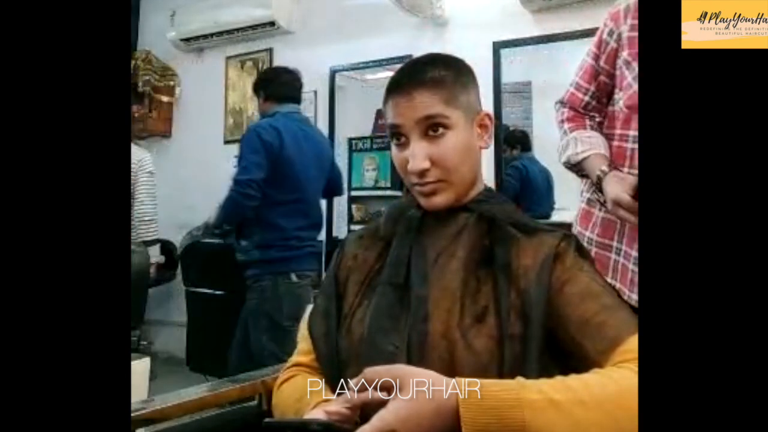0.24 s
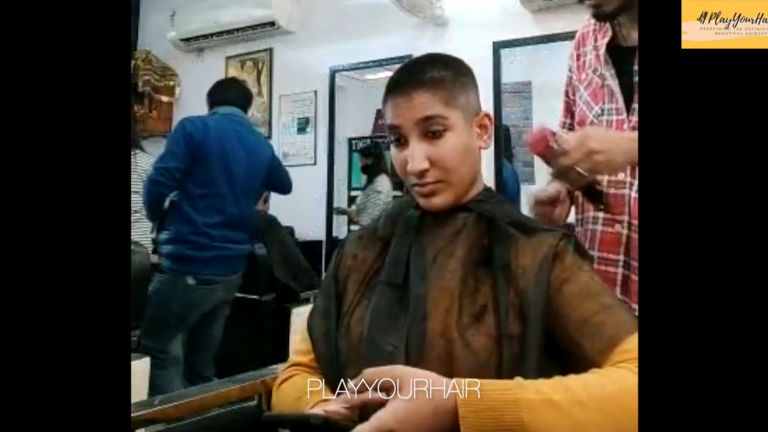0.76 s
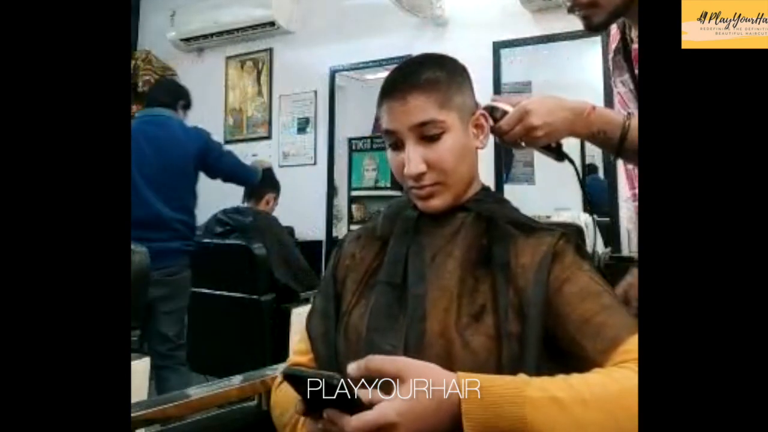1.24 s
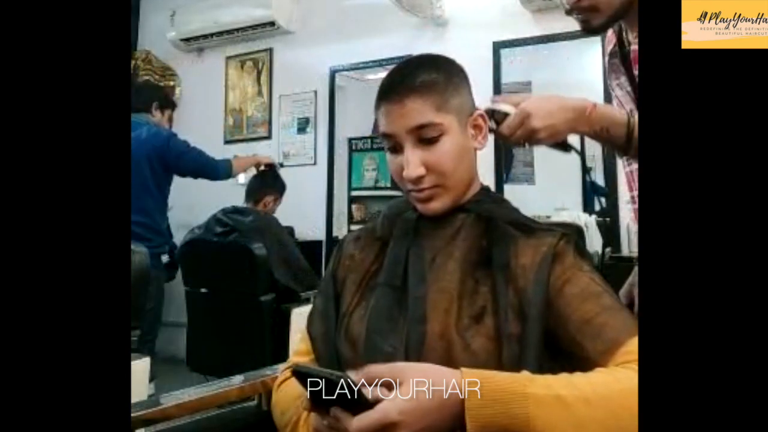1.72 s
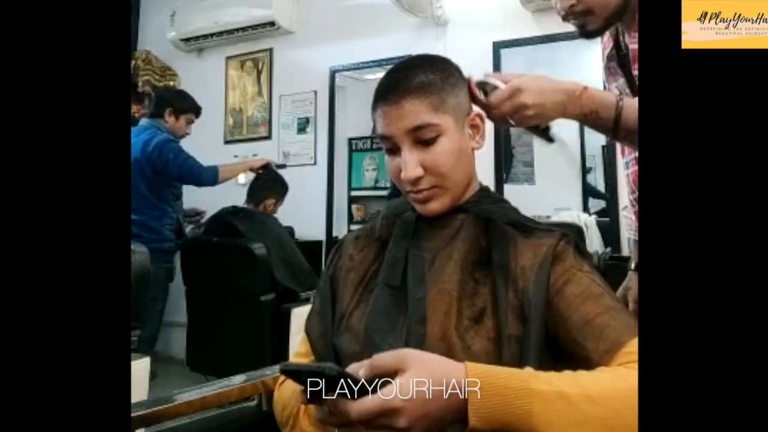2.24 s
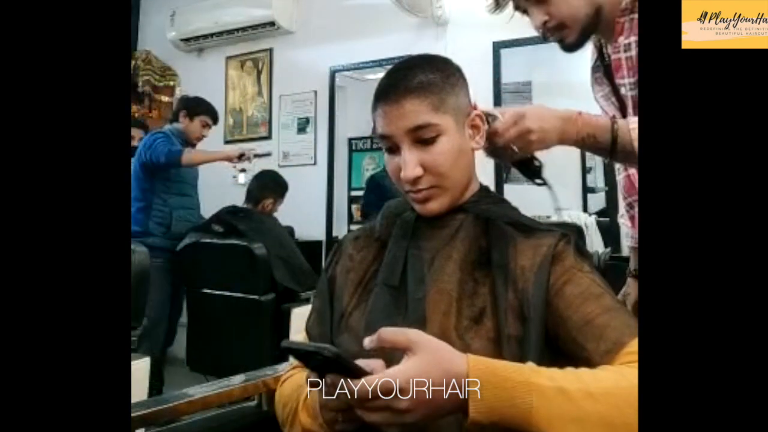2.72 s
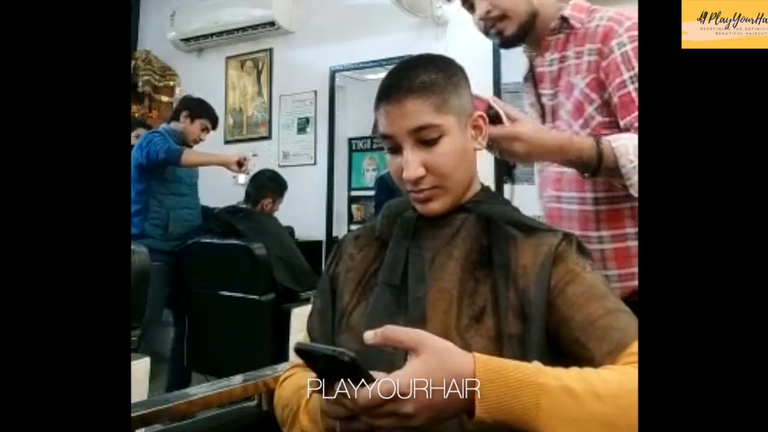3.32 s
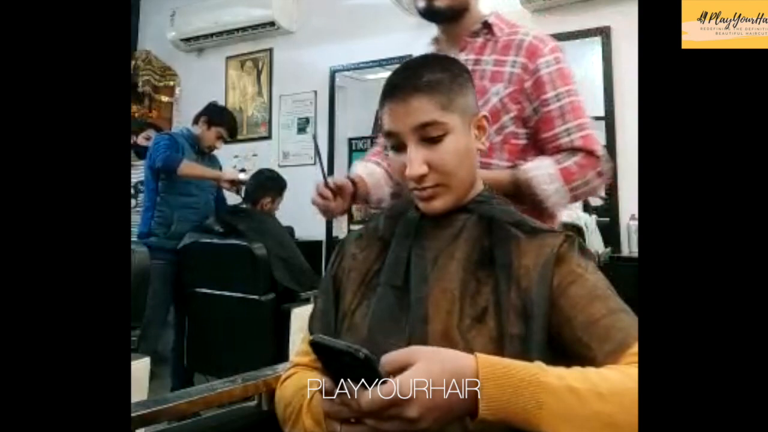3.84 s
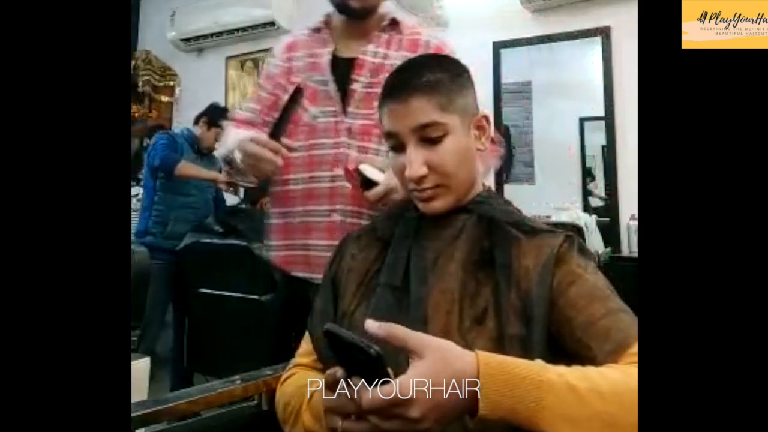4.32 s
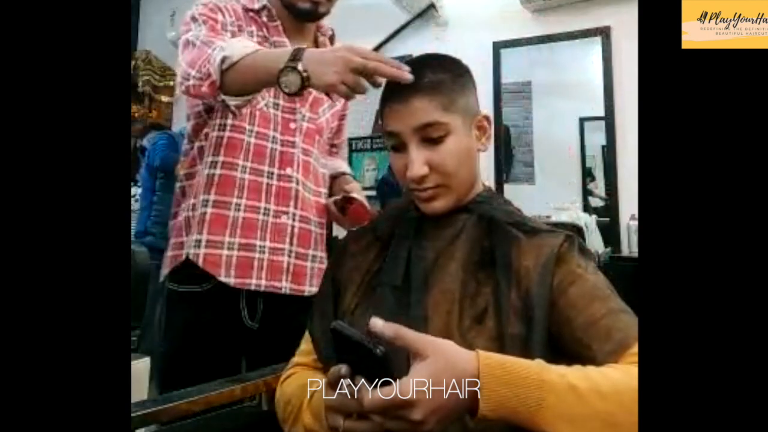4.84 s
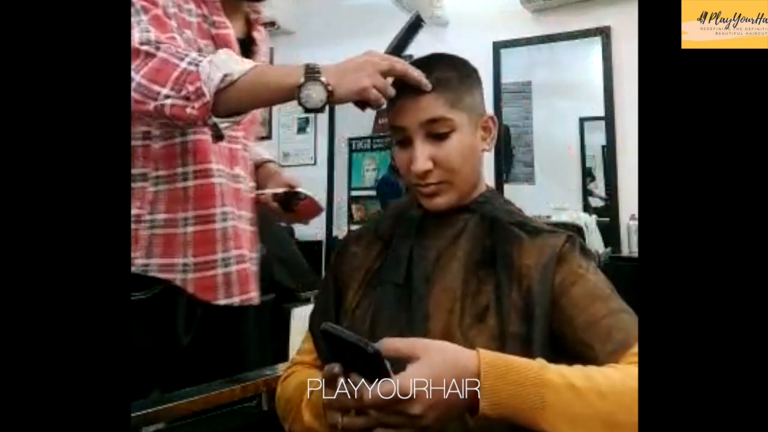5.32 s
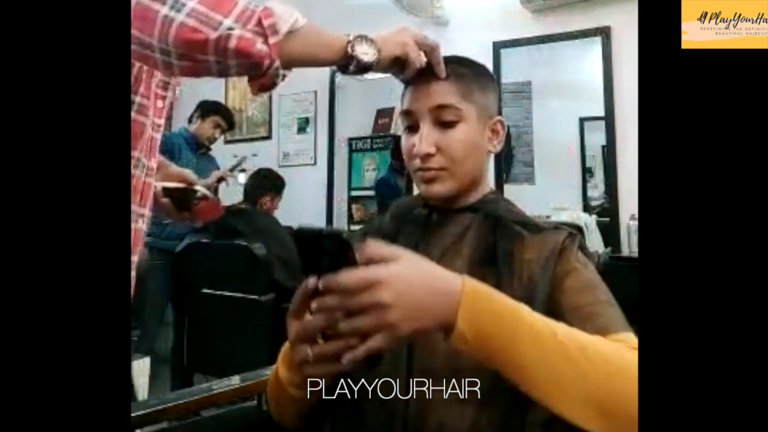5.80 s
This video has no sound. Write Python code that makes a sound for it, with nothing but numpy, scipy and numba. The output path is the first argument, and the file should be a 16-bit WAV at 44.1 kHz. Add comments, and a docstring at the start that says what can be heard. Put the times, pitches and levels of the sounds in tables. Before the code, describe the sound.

An electric hair clipper buzzes steadily close by, its bright raspy drone pulsing about four times a second against a scalp while slowly growing fainter.

```python
"""A hair clipper buzzes close by, a little to the left, stroked over a scalp about four times a second. Its
motor turns a cam that throws the blade to and fro: a comb of shaft orders, one sharp tick a turn, and scrape.
Each press brings out the low hum and shifts the tick from its low ring to its high one; the pitch saws after it
as the casing moves. About two seconds in, one range is dulled briefly; throughout, the clipper is drawn away,
the hum fading faster. Side signal and top treble are switched on and off in random patches of time and
frequency."""
import sys
import numpy as np
from scipy import signal
from scipy.io import wavfile
from scipy.ndimage import uniform_filter1d
from numba import njit

SR = 44100
rng = np.random.default_rng(int(sys.argv[2]) if len(sys.argv) > 2 else 0)


def file_out(sig):
    """Save sig as 16-bit WAV at sys.argv[1]."""
    # one column per channel
    cols = np.atleast_2d(sig).T
    # limit, then scale
    lim = np.clip(cols, -1, 1)
    pcm = np.round(lim * 32767).astype(np.int16)
    wavfile.write(sys.argv[1], SR, pcm)


def voltage_ratio(level):
    """Linear amplitude factor for a level in decibels (scalar or array-like)."""
    return 10 ** (np.asarray(level, float) / 20)


N = 267686

# strokes over the scalp: hardest press [t/s], lean-in [t/s], nominal hum re buzz [level/dB], peak-to-peak speed swing [rpm]
STROKES = [(.02, .1, -29, 4), (.36, 0.29, -29, 8.3), (.59, 0.15, -27, 15), (.72, .07, -35.5, 2),
           (.83, .06, -31.5, 13), (1.06, 0.1, -26.5, 16), (1.28, .12, -25.5, 13.4),
           (1.531, 0.24, -26, 20.4), (1.82, .12, -28.5, 16), (2.21, 0.24, -28.5, 11),
           (2.47, 0.092, -28.5, 10.5), (2.74, 0.16, -28, 18), (3.03, 0.17, -27, 11),
           (3.31, 0.16, -27.5, 14.5), (3.59, 0.18, -26.5, 12), (3.85, 0.26, -28, 3.2), (4.1, 0.13, -31, 15),
           (4.39, 0.21, -29, 9.8), (4.65, 0.11, -26.5, 7.9), (4.95, 0.2, -29, 15), (5.23, 0.24, -28.5, 12),
           (5.47, 0.12, -32.5, 7.6), (5.79, 0.35, -30, 6), (6.05, 0.074, -36, 3.3)]
# radiation of casing and blade, a row per shaft order from the first:
# relative level at middling pressure [level/dB], change with hum [dB/dB]
ORDERS = [(-41.5, 0.94), (-30, 0.64), (-22, 1.1), (-25.5, 0.82), (-33.5, 0.12), (-26, 0.38), (-31, 0.63),
          (-23.5, -0.31), (-27.5, -0.49), (-11, -0.18), (-9.5, 0.61), (-6.5, -0.31), (-1.5, -0.033),
          (-6.5, 0.42), (-5, -0.094), (-50, 0.2), (-31, -0.16), (-7.5, 0.29), (-3, 0.088), (-19, -1.16),
          (-13, -0.29), (-17, -0.25), (-61, 0.0097), (-22, 0.59), (-25, -0.67), (-5.5, -0.4), (-8.5, 0.041),
          (0.5, 0.16), (-7.5, -0.9), (-2.5, 0.16), (-6.5, 0.0099), (-2, 0.072), (-10, -0.44), (-4, 0.1),
          (-60, 0.34), (-44, 0.15), (-16.5, -0.18), (-7.5, 0.24), (-7.5, -0.31), (-7, -0.53), (-8, -0.014),
          (-11, -0.42), (-12.5, -0.26), (-17, -0.45), (-18, -0.42), (-18.5, 0.37), (-11, 1.43),
          (-10, -0.038), (-6, 0.26), (-22, -0.29), (-16, 0.11), (-16.5, 0.7), (-36, 1.3), (-9.5, -0.62),
          (-5.5, -0.0043), (-8.5, 0.26), (-13, 0.67), (-25.5, 0.9), (-6.5, -0.11), (-13, 0.1), (-4, 0.44),
          (-27, 1.1), (-14.5, -0.69), (-10, -0.15), (-11, 0.36), (-16, 0.9), (-13, -0.037), (-14.5, -0.1),
          (-19, -1.1), (-14, 0.44), (-22, -0.46), (-33, 0.31), (-26, 0.55), (-24.5, 0.33), (-26.5, -0.19),
          (-33, -1.24), (-19.5, 0.41), (-44, -0.023), (-25, 0.12), (-28.5, 0.32), (-35, 0.3), (-35, 0.49),
          (-34, 0.2), (-28, -0.51), (-28, 0.078), (-35, -0.42), (-25.5, 0.68), (-23.5, -0.85), (-27, -0.12),
          (-28.5, 0.053), (-20, 0.2), (-19.5, 0.29), (-25, 0.12), (-22, -0.11), (-27, 0.082), (-26.5, 1),
          (-24.5, 0.088), (-19, -0.75), (-26, -0.056), (-19, 0.19), (-31, -0.75), (-20.5, 0.14),
          (-26, -0.55), (-27, -0.63), (-20.5, -0.75), (-44, -0.2), (-32, -0.018), (-22, 0.1)]
# part of each order that drifts as the hand turns the casing: [f/Hz], level of each wander on the ORDERS scale [level/dB]
DRIFTING = [(100, -46), (300, -38), (800, -33.5), (1250, -13.5), (1600, -21.5), (1900, -22), (2300, -24.5),
            (2900, -14.5), (3450, -17.5), (3900, -15.5), (4450, -22), (4800, -17.5), (5600, -14.5),
            (7000, -21.5), (8200, -30), (10600, -28.5)]
# rings struck by the tick (high, low, middle): [f/Hz], pole width [f/Hz], point of the turn [turns]
RINGS = [(12500, 1150, .84), (11150, 1200, .78), (11850, 900, .81)]
# teeth sliding past each other: [f/Hz], relative density [level/dB per Hz]
SCRAPE_SPECTRUM = [(40, -43), (200, -21.5), (650, -26.5), (1200, -3.5), (1650, -8), (1900, -2), (2250, -10),
                   (2900, 0.5), (3500, -13.5), (3900, -3.5), (4500, -8.5), (5800, -5.5), (7800, -10),
                   (10500, -9.5), (12800, -1), (14000, -13), (15300, -34)]
# blows in a turn, each setting order phases near its part's range: [f/Hz], width [f/Hz], point [turns], weight [level/dB]
KNOCKS = [(300, 400, .45, 0), (300, 400, .87, -1), (1200, 300, .72, 0), (1200, 300, .27, -7),
          (1200, 300, .47, -8), (1900, 250, .2, 0), (1900, 250, .88, -2), (2900, 400, .79, 0),
          (2900, 400, .1, -3), (2900, 400, .3, -3), (2900, 400, .46, -6), (3900, 350, .88, 0),
          (3900, 350, .36, -5), (5600, 900, .76, -1), (5600, 900, .9, 0), (5600, 900, .24, -4),
          (5600, 900, .05, -6), (5600, 900, .63, -7)]
# one range dulled briefly: from [t/s], to [t/s], centre [f/Hz], width [f/Hz], change at centre [level/dB]
DULLED = (1.9, 2.26, 3500, 400, -8)
# gate on the top treble, random on/off: lower edge [f/Hz], high ring below which it may open [level/dB], open gain [level/dB]
TOP_GATE = (13350, -17, 7)
# balance of the middle signal: [f/Hz], left minus right [level/dB]
LEFT_BALANCE = [(60, 2), (180, -6), (540, 1), (1640, 3), (4920, 2.5), (14800, 2)]
# gain of drift and scrape that reach the sides unlike: [f/Hz], [level/dB]
UNLIKE_SIDES = [(60, -22), (180, 0), (350, 2), (600, -41), (900, -4.5), (1600, -7), (3000, -20),
                (6000, -19), (9000, -13), (13000, -9)]
# tick and its weaker repeats: delay [turns], [level/dB]
TICK_REPEATS = [(0, 0), (.25, -13), (.45, -10)]
# gate on the side signal, random on/off: [f/Hz], chance above which it opens [standard deviations]
SIDE_GATE = [(60, .5), (250, 1.2), (550, 2.2), (800, 0), (1100, -1.6), (2200, -.7), (2800, -2.5),
             (6000, -2.5), (8500, -.4), (10000, -.4), (11500, -1.6)]
# drawing away: [t/s], overall gain [level/dB], low ring re buzz at middling pressure [level/dB]
AWAY = [(0, -25, -25), (.13, -27.5, -21), (.32, -25.5, -27), (.46, -28, -26), (.75, -27.5, -15.5),
        (1.1, -27.5, -24), (1.5, -28, -17), (2.05, -26.5, -18), (2.2, -29, -16), (3.05, -29, -14.5),
        (3.7, -30.5, -24), (4.1, -29, -15), (4.25, -30.5, -14), (5.35, -32, -17), (5.6, -34, -18),
        (5.8, -32.5, -21), (5.97, -35, -16), (6.07, -33, -12)]

SHAFT_RPM = 5847.6
SWING_LAG_S, SWING_DROP_S = 0.038, 0.067  # speed tops out after the press, then drops; climbs until the next
LIFTED_DB, PRESSED_DB = -40, -33  # nominal hum off the head; at middling pressure
LEAN_EXPONENT, RELEASE_S = 0.82, 0.089
HUM_FADE_DB_PER_S = -0.35  # below 450 Hz, on top of AWAY
TICK_JITTER_S, TICK_UNEVEN_DB = 3e-6, 1.0  # standard deviations
HIGH_RING_DB, MIDDLE_RING_DB = -15, -23.5  # re buzz, at middling pressure
HIGH_DB_PER_DB, LOW_DB_PER_DB, MIDDLE_DB_PER_DB = 0.87, -0.32, 1.16  # ring change per dB of hum
SCRAPE_DB, SCRAPE_PATCHY_DB = -12.5, 2.2  # level re buzz; standard deviation of patches


def pressure(t):
    """Nominal hum in dB: each stroke leans in up to its peak and lifts off quickly; the hardest press rules."""
    peak_s, lean_in_s, hum_db, _ = np.transpose(STROKES)[:, :, None]
    leaning = np.clip(1 + (t - peak_s) / lean_in_s, 0, 1) ** LEAN_EXPONENT
    lifting = np.clip(1 - (t - peak_s) / RELEASE_S, 0, 1)
    shape = np.where(t < peak_s, leaning, lifting)
    return LIFTED_DB + ((hum_db - LIFTED_DB) * shape).max(0)


def speed(t):
    """Turns a second as heard: the pitch saws slightly, one tooth a stroke, as the casing moves to and fro."""
    peak_s, _, _, swing_rpm = np.transpose(STROKES)
    corners_s = peak_s[:, None] + [SWING_LAG_S, SWING_LAG_S + SWING_DROP_S]
    saw_rpm = np.interp(t, corners_s.ravel(), np.outer(swing_rpm, [.5, -.5]).ravel())
    return (SHAFT_RPM + saw_rpm - saw_rpm.mean()) / 60


def orders(turns, press_db, shaft_hz, step=256):
    """Steady shaft orders phased by the knocks plus a drifting part; a second drift differs between sides."""
    steady_db, share = np.transpose(ORDERS)
    count = len(ORDERS)
    k = np.arange(count) + 1
    hz = shaft_hz * k
    blows = 0
    for f, width, point, db in KNOCKS:
        blows = blows + voltage_ratio(db) * np.exp(-((hz - f) / width) ** 2 / 2 - 2j * np.pi * k * point)
    steady = voltage_ratio(steady_db) * np.exp(1j * np.angle(blows))

    def drift():
        return voltage_ratio(read(DRIFTING, hz))[:, None] * (wander(count, .06, step) + wander(count, .012, step))

    middle_drift, side_drift = drift(), drift()
    at = np.minimum(np.arange(middle_drift.shape[1]) * step, N - 1)
    start, end, dull_hz, dull_width, dull_db = DULLED
    shade = np.interp(at / SR, [start - .04, start + .04, end - .02, end + .02], [0, 1, 1, 0])
    change_db = np.outer(dull_db * np.exp(-((hz - dull_hz) / dull_width) ** 2 / 2), shade)
    change_db += np.outer(share, press_db[at] - PRESSED_DB)
    change_db += np.outer(hz < 450, HUM_FADE_DB_PER_S * (at - N / 2) / SR)
    gain = voltage_ratio(change_db)
    mid = comb(turns, np.ascontiguousarray(((steady[:, None] + middle_drift) * gain).T), step)
    apart = comb(turns, np.ascontiguousarray((side_drift * gain).T), step)
    return np.array([mid, apart]) / mid.std()


@njit
def comb(turns, sizes, step):
    """Sums harmonics of the shaft angle, each with its own slowly changing complex size."""
    out = np.zeros(len(turns))
    for n in range(len(turns)):
        first = np.exp(2j * np.pi * turns[n])
        frame, part, spin = n // step, n % step / step, first
        for k in range(sizes.shape[1]):
            out[n] += (spin * ((1 - part) * sizes[frame, k] + part * sizes[frame + 1, k])).real
            spin *= first
    return out


def ticks(turns, ring_dbs, rattle_db=-44):
    """The blade knocks hard once a turn, with weaker knocks later in the turn; loose rattle excites the same
    rings."""
    out = np.zeros(N)
    later, repeat_db = np.transpose(TICK_REPEATS)
    blows = (np.arange(int(turns[-1]) - 1)[:, None] + later).ravel()
    chance = rng.standard_normal((len(blows), 2))
    size = voltage_ratio(TICK_UNEVEN_DB * chance[:, 0] + np.resize(repeat_db, len(blows)))
    for (hz, width, point), db in zip(RINGS, ring_dbs):
        at = np.interp(blows + point, turns, np.arange(N)) + TICK_JITTER_S * SR * chance[:, 1]
        # windowed sinc: blows fall between samples
        near = at.astype(int)[:, None] + np.arange(-8, 9)
        off = near - at[:, None]
        pulse = np.sinc(off) * np.cos(np.pi * off / 18) ** 2
        clicks = voltage_ratio(rattle_db) * rng.standard_normal(N + 16)
        np.add.at(clicks, near, size[:, None] * pulse)
        out += voltage_ratio(db) * evened(resonate(clicks[:N], hz, width))
    return out


def scrape(turns, count):
    """Patchy hiss that swells twice a turn, when the blade moves fastest."""
    angle = 2 * np.pi * (turns - .85)
    swell = voltage_ratio(2.9 * np.cos(angle) + 3.3 * np.cos(2 * angle))
    hiss = swell * rng.standard_normal((count, N))

    def gains(hz, frames):
        patchy_db = SCRAPE_PATCHY_DB * patches(len(hz), frames, 3, 14)
        return voltage_ratio(read(SCRAPE_SPECTRUM, hz)[:, None] + patchy_db)

    return evened(coloured(hiss, gains))


def sides(mid, apart):
    """Left and right from a leaning middle and an unlike part; a random gate per range drops the side signal."""
    def lean(hz, frames):
        return np.tanh(read(LEFT_BALANCE, hz) * np.log(10) / 40)[:, None]

    def unlike(hz, frames):
        return voltage_ratio(read(UNLIKE_SIDES, hz))[:, None]

    def gate(hz, frames):
        return patches(len(hz), frames, 2, 16) > read(SIDE_GATE, hz)[:, None]

    side = coloured(coloured(mid, lean) + coloured(apart, unlike), gate)
    return np.array([mid + side, mid - side])


def gate_top(x, high_ring_db):
    """A random on/off gate on all sound above an edge, held shut unless the high ring is weak."""
    edge_hz, below_db, open_db = TOP_GATE

    def gains(hz, frames):
        at = np.minimum(np.arange(frames) * 128, N - 1)
        may_open = high_ring_db[at] < below_db
        gate = voltage_ratio(open_db) * may_open * (patches(len(hz), frames, 4, 24) > .5)
        return np.where(hz[:, None] > edge_hz, gate, 1)

    return coloured(x, gains)


def evened(x):
    """Scales to rms 1."""
    return x / np.sqrt(np.mean(abs(x) ** 2) + 1e-20)


def read(points, hz):
    """Reads a spectrum on a log-frequency axis."""
    f, value = np.transpose(points)
    return np.interp(np.log(hz + 1), np.log(f + 1), value)


def resonate(x, hz, width, order=4):
    """A fixed resonance, applied several times for steep skirts."""
    pole = np.exp((2j * hz - width) * np.pi / SR)
    return signal.lfilter([1], np.poly([pole] * order), x + 0j).real


def wander(count, seconds, step):
    """Rows of slow complex chance, one value every step samples."""
    z = rng.standard_normal((count, N // step + 2, 2)) @ [1, 1j]
    span = max(int(seconds * SR / step), 1)
    smooth = uniform_filter1d(z, span, mode="wrap")
    return evened(uniform_filter1d(smooth, span, mode="wrap"))


def patches(bins, frames, wide, long):
    """A random field of blobs, wide bins by long frames."""
    field = rng.standard_normal((bins, frames))
    return evened(uniform_filter1d(uniform_filter1d(field, wide, 0), long, 1))


def coloured(x, gains):
    """Multiplies short-time spectra by gains(hz, frames)."""
    hz, t, z = signal.stft(x, SR, nperseg=512, noverlap=384)
    return signal.istft(z * gains(hz, len(t)), SR, nperseg=512, noverlap=384)[1][..., :N]


def scene():
    """Pressure and speed drive orders, ticks and scrape; the sum is spread to two sides and drawn away."""
    t = np.arange(N) / SR
    away_s, away_db, away_low_db = np.transpose(AWAY)
    level_db = np.interp(t, away_s, away_db)
    low_ring_db = np.interp(t, away_s, away_low_db)
    press_db = np.interp(t, t[::64], pressure(t[::64]))
    harder_db = press_db - PRESSED_DB
    ring_dbs = [HIGH_RING_DB + HIGH_DB_PER_DB * harder_db,
                low_ring_db + LOW_DB_PER_DB * harder_db,
                MIDDLE_RING_DB + MIDDLE_DB_PER_DB * harder_db]
    shaft_hz = speed(t)
    turns = np.cumsum(shaft_hz) / SR
    buzz = orders(turns, press_db, shaft_hz.mean())
    mid, apart = buzz + voltage_ratio(SCRAPE_DB) * scrape(turns, count=2)
    mid = mid + ticks(turns, ring_dbs)
    return voltage_ratio(level_db) * gate_top(sides(mid, apart), ring_dbs[0])


def band_limit(x):
    """A steep low-pass at the top of the band."""
    return signal.sosfilt(signal.butter(12, 15420, fs=SR, output="sos"), x)


def record(dry):
    """The scene is the finished mix: no room or microphone is added."""
    return band_limit(dry)


dry = scene()
out = record(dry)
file_out(out)
```